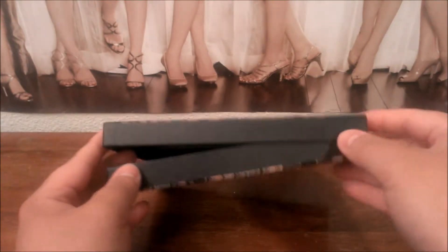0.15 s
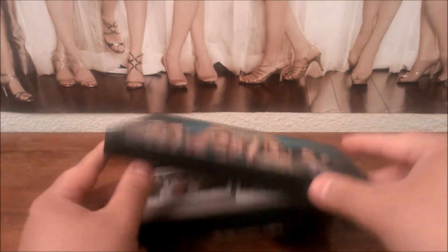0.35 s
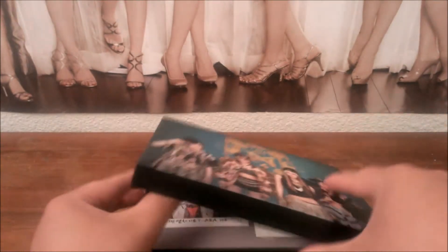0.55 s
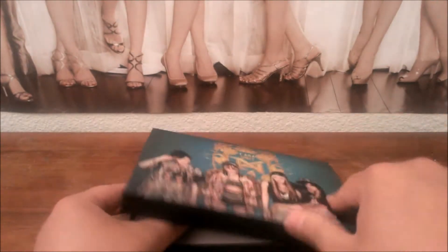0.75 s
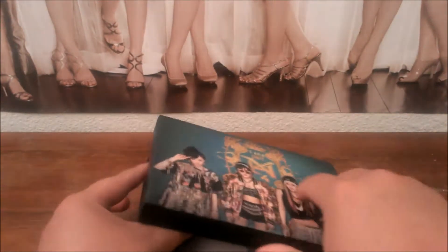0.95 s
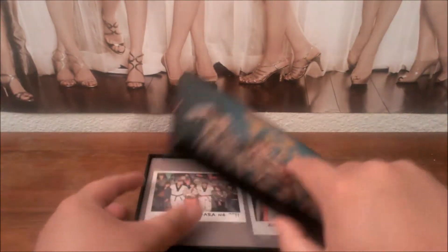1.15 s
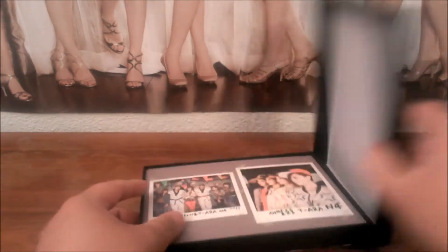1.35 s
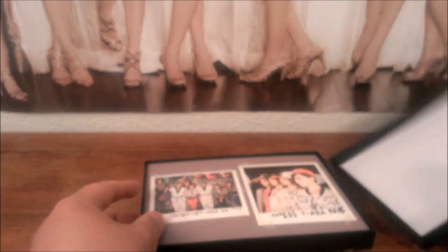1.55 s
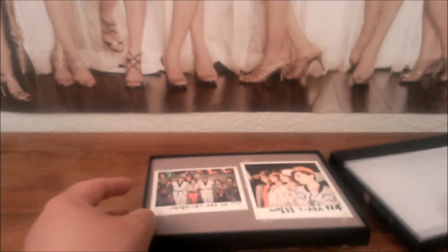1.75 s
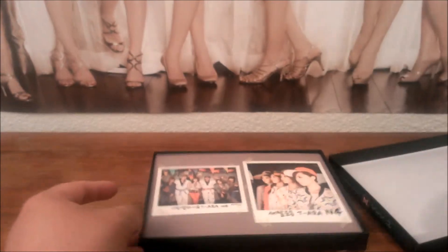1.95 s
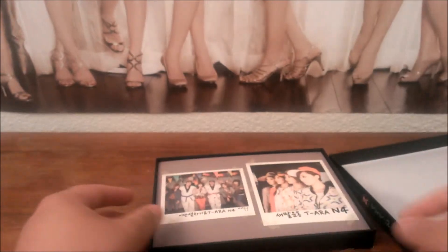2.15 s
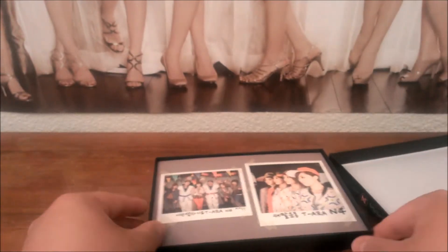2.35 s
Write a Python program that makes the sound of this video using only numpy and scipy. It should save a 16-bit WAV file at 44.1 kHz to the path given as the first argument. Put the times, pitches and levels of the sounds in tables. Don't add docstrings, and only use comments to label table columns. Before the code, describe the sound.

A stiff cardboard lid is worked off its box with soft finger rubbing, one firm knock and small taps, then dropped with a scraping clack and final knocks on a wooden table, close in a quiet room.

```python
import sys
import numpy as np
from scipy import signal
from scipy.io import wavfile

SR = 44100
rng = np.random.default_rng(int(sys.argv[2]) if len(sys.argv) > 2 else 0)


def ratio_of_db(decibels):
    return 10 ** (np.asarray(decibels, float) / 20)


def unload_audio(sound):
    columns = np.transpose(np.atleast_2d(sound))
    steps = np.round(np.clip(columns, -1, 1) * 32767)
    wavfile.write(sys.argv[1], SR, steps.astype(np.int16))


N = 109941


def rms_one(x):
    return x / np.sqrt(np.mean(x ** 2) + 1e-20)


def curve(rows):
    return np.interp(np.arange(N) / SR, *np.transpose(rows))


def drift(rate):
    r = np.exp(-80 * np.pi * rate / SR)
    slow = signal.lfilter([1], [1, -2 * r, r * r], rng.standard_normal(N // 40 + 2002))[2000:]
    return np.interp(np.arange(N) / 40, np.arange(len(slow)), rms_one(slow))


def ring(x, hz, t60):
    r = ratio_of_db(-60 / (np.maximum(t60, 1e-3) * SR))
    w = 2 * np.pi * hz / SR
    return signal.lfilter([0, np.sin(w)], [1, -2 * r * np.cos(w), r * r], x + 1e-18)


def colour(x, spectrum, patchy_db=0):
    hz, db = np.transpose(spectrum)
    edges = 25 * 2 ** np.arange(0, 9.3, .5)
    out, power = 0, 0
    for k, (low, high) in enumerate(zip(edges, edges[1:])):
        gain = ratio_of_db(np.interp(np.log(low * high) / 2, np.log(hz), db, left=-60, right=db[-1]))
        band_pass = signal.butter(2, [low, high], "band", fs=SR, output="sos")
        band = signal.sosfilt(band_pass, x + 1e-18)
        flicker = ratio_of_db(patchy_db * drift(33)) if patchy_db else 1
        out = out + (-1) ** k * gain * band * flicker
        power += gain ** 2 * (high - low) / (SR / 2)
    return out / np.sqrt(power)


def fall(s, rise_s, hold_s, tail_s):
    t = np.arange(N) / SR - s
    tail = np.exp(-np.maximum(t - rise_s - hold_s, 0) / np.maximum(tail_s, 1e-4))
    return np.clip(t / rise_s, 0, 1) * tail


RIGHT_LAG_S, PORT_HZ, PORT_Q = .0001, 5000, 2.0
DIP_HZ, DIP_DB, DIP_Q = 1300, -9, .9


def through_air(x, pan_db):
    late = np.interp(np.arange(N) - RIGHT_LAG_S * SR, np.arange(N), x)
    w = 2 * np.pi * PORT_HZ / SR
    r = np.exp(-w / (2 * PORT_Q))
    poles = [1, -2 * r * np.cos(w), r * r]
    late = signal.lfilter([sum(poles)], poles, late + 1e-18)
    middle = signal.lfilter(*signal.iirpeak(DIP_HZ, DIP_Q, fs=SR), late)
    late = late - (1 - ratio_of_db(DIP_DB)) * middle
    return np.array([x * ratio_of_db(pan_db / 2), -late * ratio_of_db(-pan_db / 2)])


# frequency in Hz, density in dB per Hz.
HISS_LEFT = [(25, -9), (60, -13), (180, 3.5), (500, -10.5), (2000, -15.5), (5000, -16.5), (7000, -13),
             (10500, -35)]
HISS_RIGHT = [(25, 17.5), (40, -16), (80, 0.5), (180, -4.5), (500, -18.5), (2000, -22), (5000, -21.5),
              (11000, -33.5)]
HISS_LEFT_DB, HISS_RIGHT_DB = -65, -62.5
WHINE_HZ, WHINE_WIDTH_HZ, WHINE_DB, WHINE_FROM_S = 1880, 70, -73, 1.9
OVERTONE_DB, THROB_DB = -4, -0.5


def floor():
    left, right, air = rng.standard_normal((3, N))
    t60 = 2.2 / WHINE_WIDTH_HZ
    tone = rms_one(ring(air, WHINE_HZ, t60))
    octave = rms_one(ring(air, 2 * WHINE_HZ, t60 / 4))
    swell = 0.32 + fall(WHINE_FROM_S, 0.42, 1, 1)
    whine = (tone + ratio_of_db(OVERTONE_DB) * octave) * ratio_of_db(WHINE_DB + THROB_DB * drift(45)) * swell
    hiss_left = ratio_of_db(HISS_LEFT_DB) * colour(left, HISS_LEFT, patchy_db=1.2)
    hiss_right = ratio_of_db(HISS_RIGHT_DB) * colour(right, HISS_RIGHT, patchy_db=1.4)
    return np.array([hiss_left, hiss_right]) + through_air(whine, 12)


ROOM_T60_S, ROOM_DB, WALL_CUT_HZ = 0.21, -25.5, 2200


def room(x):
    out = np.zeros((2, N))
    dull = np.exp(-2 * np.pi * WALL_CUT_HZ / SR)
    lags = (rng.uniform(.007, 0.025, 12) * SR).astype(int)
    for k, lag in enumerate(lags):
        loop, state = x.copy(), [0.]
        gain = ratio_of_db(-60 * lag / SR / ROOM_T60_S)
        for i in range(lag, N, lag):
            back, state = signal.lfilter([gain * (1 - dull)], [1, -dull], loop[i - lag:i], zi=state)
            loop[i:i + lag] += back[:N - i]
        out[k % 2] += (loop - x) * (-1) ** (k // 2)
    return out


# time in seconds, level in dB, extra brightness in dB.
RUB = [(0, -67, -14), (0.082, -62.5, 0), (0.189, -95, 0), (.3, -76, 4), (0.471, -72.5, -2),
       (.75, -74.5, 1.5), (.87, -63, -2.5), (1.04, -77.5, 4.5), (1.13, -69.5, -9.5), (1.2, -66, -6.5),
       (1.379, -66.5, -12), (1.459, -63.5, -4), (1.538, -60.5, -9), (1.59, -81, 4.5), (1.69, -87, -1),
       (1.8, -67.5, -10.5), (1.949, -56.5, -9.5), (2.25, -74.5, -26)]
# frequency in Hz, density in dB per Hz.
RUB_COLOUR = [(300, -2.5), (1000, -2.5), (2200, -5.5), (5000, -3.5), (11000, -2)]
RUB_DB, RUB_PAN_DB = -0.5, 22.5
RUB_PATCH_DB, RUB_SPLIT_HZ = .8, 5000


def rub():
    s, level_db, bright_db = np.transpose(RUB)
    hiss = colour(rng.standard_normal((2, N)), RUB_COLOUR, patchy_db=RUB_PATCH_DB)
    dull = signal.lfilter(*signal.butter(3, RUB_SPLIT_HZ, fs=SR), hiss)
    top = signal.lfilter(*signal.butter(3, RUB_SPLIT_HZ, "high", fs=SR), hiss)
    gripped = dull + top * ratio_of_db(curve(np.c_[s, bright_db]))
    shared, right_only = gripped * ratio_of_db(curve(np.c_[s, level_db]) + RUB_DB + 0.7 * drift(38))
    extra = 4.26 * through_air(right_only, RUB_PAN_DB) * np.array([[0], [1]])
    return through_air(shared, RUB_PAN_DB) + extra


# frequency in Hz, level in dB, T60 in seconds.
BOX = [(358, 8.5, 0.024), (390, -26.5, 0.047), (510, -8.5, 0.033), (690, 17, 0.019), (758, -6.5, 0.03),
       (880, -0.5, 0.058), (1026, 12, 0.017), (1392, 17.5, 0.012), (1570, 13.5, 0.004), (1840, 4.5, 0.039),
       (2430, -6, 0.045), (2650, 5.5, 0.008), (3230, -7, 0.016), (3980, -3.5, 0.0033)]
# time in seconds, level in dB.
DRAG = [(0, -62), (.1, -62), (.18, -75), (.42, -61), (.55, -70.5), (1.05, -68.5), (1.12, -63), (1.3, -60.5),
        (1.45, -77), (1.6, -88), (1.77, -73), (1.84, -48), (1.96, -48), (2.05, -90), (2.2, -99)]
DRAG_GRAINS_PER_S, DRAG_LUMP_DB = 3000, 1.8


def drag():
    grains = (rng.random(N) < DRAG_GRAINS_PER_S / SR) * rng.standard_normal(N)
    grit = grains * ratio_of_db(DRAG_LUMP_DB * drift(34))
    hum = sum((-1) ** k * ring(grit, hz, t60) * ratio_of_db(db) for k, (hz, db, t60) in enumerate(BOX))
    return through_air(rms_one(hum) * ratio_of_db(curve(DRAG)), 4.3)


# start in seconds, peak level in dB, pitch in Hz, hold in ms, tail in ms.
TICKS = [(.101, -66, 4080, 3.3, 7.6), (.305, -62, 8300, 15, 8), (.395, -62, 6900, 15, 7.7),
         (0.409, -60, 8600, 4.9, 4.6), (.445, -61.5, 2100, 37, 15), (.477, -60, 8200, 12, 7.9),
         (0.479, -59, 3250, 4.5, 4.1), (0.798, -52.5, 1360, 3.2, 3), (1.18, -63, 3000, 17, 10),
         (1.44, -57.5, 2080, 21, 12), (1.527, -58.5, 4400, 5.6, 6.8), (1.527, -53, 7300, 5, 3),
         (1.748, -61.5, 4080, 2.5, 10), (1.747, -64, 6500, 1.2, 2.2), (1.772, -59.5, 5350, 15, 10),
         (1.79, -59, 8000, 3, 4.6), (1.827, -62, 4000, 3.7, 2.8), (1.8588, -44, 5500, 2.7, 2.7),
         (1.864, -38.5, 3870, 1.9, 2.7), (1.86, -36, 2920, 1.8, 16), (1.862, -47, 8200, 1.8, 3.1),
         (1.904, -44, 5170, 1.2, 4.2), (1.933, -53, 8500, 1.5, 2.2), (1.9345, -34, 2720, 4.2, 6),
         (1.938, -51, 4100, 1, 2.1), (1.968, -50, 5440, 1.2, 3), (1.972, -59, 9000, 1.2, 2.2),
         (2.093, -50.5, 8330, 4.7, 24), (2.163, -58.5, 8200, 2.5, 2.9), (2.301, -69, 4660, 37, 29),
         (2.41, -67.5, 3800, 8.4, 6)]
TICK_Q, TICK_PAN_DB, TICK_RISE_S = 7.3, 6, 0.00036
SWELL = 0.17


def ticks():
    out = np.zeros(N)
    grit = rng.standard_normal(N) * ratio_of_db(1.63 * drift(100))
    for s, db, hz, hold_ms, tail_ms in TICKS:
        span = slice(int(s * SR), int(s * SR) + SR // 8)
        envelope = fall(s, TICK_RISE_S + SWELL * hold_ms / 1000, hold_ms / 1000, tail_ms / 1000)
        puff = signal.lfilter(*signal.iirpeak(hz, TICK_Q, fs=SR), (grit * envelope)[span])
        out[span] += ratio_of_db(db) * puff * np.sqrt(TICK_Q * SR / (np.pi * hz))
    return through_air(out, TICK_PAN_DB)


# start in seconds, peak level in dB, hold in ms, tail in ms.
SLIPS = [
    (1.858, -32, 3.2, 9.3),
    (1.932, -34.5, 1.4, 1.9),
    (1.939, -38.5, 1.5, 10.6),
    (2.40, -58, 25, 17),
]
# frequency in Hz, density in dB per Hz.
SKID = [(500, 3), (1000, -12), (1600, 0), (2800, -4), (4300, -18), (7000, 6.5), (11000, -41)]
SKID_GRAINS_PER_S, SKID_PAN_DB = 9000, 4


def skids():
    grains = (rng.random(N) < SKID_GRAINS_PER_S / SR) * rng.standard_normal(N)
    grit = rms_one(grains * ratio_of_db(0.62 * drift(210)))
    stroke = 0
    for s, db, hold_ms, tail_ms in SLIPS:
        stroke = stroke + ratio_of_db(db) * fall(s, 0.00052, hold_ms / 1000, tail_ms / 1000)
    return through_air(colour(grit, SKID) * stroke, SKID_PAN_DB)


# start in seconds, peak level in dB, extra depth in dB per octave.
THUMPS = [(0.034, -46.5, 0), (0.093, -43, 7), (0.261, -41.5, 5), (0.341, -49, 3), (0.438, -54.5, 14),
          (0.534, -46, 8), (0.597, -22.5, 11), (0.624, -29.5, -5.5), (0.663, -37.5, -11),
          (0.699, -51, 26.5), (0.809, -33.5, 2), (0.848, -41, 15), (0.932, -44, 0.5), (1.093, -38.5, -6),
          (1.131, -47, -4), (1.218, -44.5, -3), (1.282, -39.5, 4), (1.334, -38.5, 6.5), (1.458, -55, 1),
          (1.496, -45.5, -7), (1.53, -28.5, -1), (1.788, -38.5, -9.5), (1.816, -27.5, -9), (1.866, -17, 4),
          (1.896, -29, 11.5), (1.965, -25, 1.5), (2.072, -23.5, 1), (2.098, -56, 15), (2.165, -24, 10.5),
          (2.427, -51, 5), (2.467, -52.5, 20)]
# frequency in Hz, right level in dB, left level in dB, T60 in seconds.
TABLE = [(82.4, -14, -52, 0.27), (116.9, -23, -30, 0.22), (163, 0.5, -25, 0.17), (201, -0.5, -23.5, 0.06),
         (238, -23.5, -14, 0.13), (331.2, -19, -38.5, 0.27), (394.7, -40.5, -41.5, 0.78)]
# time in seconds, level in dB.
LEAN = [(0, -46.5), (.2, -73), (.4, -61.5), (1.0, -57), (1.3, -52), (1.7, -65), (1.85, -25.5), (2.3, -71.5),
        (2.49, -48.5)]
THUMP_DB, CONTACT_S, TABLE_LOW_HZ = 0.5, 0.0039, 52.6
LEAN_DB, TREMOR_LUMP_DB = 0.5, 2.2


def table():
    out = np.zeros((2, N))
    tremor_db = curve(LEAN) + LEAN_DB + TREMOR_LUMP_DB * drift(11) - 29.5
    tremor = rng.standard_normal(N) * ratio_of_db(tremor_db)
    luck = rng.normal(0, 1.98, (len(THUMPS), len(TABLE)))
    n = max(int(CONTACT_S * SR), 8)
    shape = np.diff(np.hanning(n + 2)) * (0.0044 * SR / n)
    for k, (hz, right_db, left_db, t60) in enumerate(TABLE):
        push = tremor.copy()
        for (s, db, deep_db), chance in zip(THUMPS, luck):
            i = int(s * SR)
            push_db = db + THUMP_DB + chance[k] + deep_db * np.log2(163 / hz)
            push[i:i + n + 1] += shape[:N - i] * ratio_of_db(push_db)
        out += ring(push, hz, t60) * ratio_of_db(np.array([[left_db], [right_db]])) * (-1) ** k
    return signal.lfilter(*signal.butter(2, TABLE_LOW_HZ, "high", fs=SR), out)


# start in seconds, peak level in dB, brightness in dB, pitch in Hz, ring of the body in dB.
TAPS = [(0.265, -50, -18, 363, 4), (.271, -56, -4.5, 450, -5), (0.5316, -49.5, -13, 1030, -22),
        (0.5315, -33, -12.5, 980, -9), (0.5953, -15, -12.5, 950, 2), (0.6619, -35, -22, 543, 0.5),
        (0.8085, -28, -11, 1130, 6), (.93, -50.5, -25, 420, -0.5), (1.087, -43.5, -16, 744, 3.5),
        (1.109, -50.5, -32, 880, 4.5), (1.283, -51.5, -9, 704, 2), (1.498, -54, -10, 500, 3),
        (1.517, -44, -12, 1300, 11), (1.793, -46, -18, 600, -8), (1.814, -38.5, -3.5, 1100, 2.5),
        (1.905, -46, -9, 1090, 0), (1.925, -44.5, -1, 900, 1.5), (1.939, -40, -17, 1150, -6),
        (1.969, -43.5, -20, 930, 7), (1.9795, -32.5, -28, 1400, 5), (2.0680, -23.5, -15.5, 1000, 2.5),
        (2.0698, -24.5, -27, 1050, -7), (2.164, -49.5, -6.5, 493, -7)]
# frequency in Hz, level in dB, T60 in seconds.
LID = [(440, 1, .03), (580, 4, 0.075), (727, 19, 0.015), (973, 15, 0.012), (1300, 11, 0.012),
       (1476, 8.5, .011), (1710, -7, 0.032), (2400, -11, 0.018), (2660, -12, .012), (3850, 5, .009),
       (4400, 4, .009)]
# frequency in Hz, density in dB per Hz.
CRACK = [(1200, -13.5), (2000, -2), (4200, -20.5), (6300, -11.5), (11000, -29)]
LID_OFF_S, TAP_PAN_DB, BOX_LOW_HZ = 1.4, 4.5, 207
BLOW_DB, BLOW_CYCLES = 2, 6.8
SOFTNESS = 2.55
RATTLE_S, RATTLE, RATTLE_RISE_S = .0045, .06, .0005
BOX_DB, RING_REST_DB, OFF_PITCH_DB = -12, 3, 3
CRACK_DB, CRACK_S = 3, 0.0029


def knocks():
    out = np.zeros((2, N))
    luck = rng.normal(0, 0.53, (len(TAPS), len(BOX)))
    noise = rng.standard_normal((2, N))
    bright = colour(noise[1], CRACK)
    for (s, db, bright_db, centre_hz, ring_db), chance in zip(TAPS, luck):
        i, body = int(s * SR), np.zeros(N)
        span = slice(i, min(i + SR // 5, N))
        force = (RATTLE * noise[0] * fall(s, RATTLE_RISE_S, 0, RATTLE_S))[span]
        force[2] += 1
        force = signal.lfilter(*signal.butter(2, SOFTNESS * centre_hz, fs=SR), force)
        body[span] = ratio_of_db(BLOW_DB) * ring(force, centre_hz, BLOW_CYCLES / centre_hz)
        modes = BOX if s < LID_OFF_S else LID
        for k, (hz, mode_db, t60) in enumerate(modes):
            off_pitch_db = OFF_PITCH_DB * np.log2(hz / centre_hz) ** 2
            gain_db = BOX_DB + ring_db - RING_REST_DB + mode_db + chance[k] - off_pitch_db
            body[span] += ring(force, hz, t60) * ratio_of_db(gain_db)
        crack = bright * (fall(s, 0.0001, 0, CRACK_S) + 0.12 * fall(s, 0.0024, 0, 0.029))
        out += through_air(ratio_of_db(db) * (body + ratio_of_db(CRACK_DB + bright_db) * crack), TAP_PAN_DB)
    return signal.lfilter(*signal.butter(2, BOX_LOW_HZ, "high", fs=SR), out + 1e-18)


def scene():
    air = knocks() + skids() + drag() + ticks()
    echoes = ratio_of_db(ROOM_DB) * room(air[0]) * ratio_of_db(np.array([[0], [1.5]]))
    return table() + air + echoes + rub() + floor()


def band_limit(x):
    return signal.sosfilt(signal.butter(12, 11500, fs=SR, output="sos"), x)


def record(dry):
    low_pass = signal.ellip(10, .5, 75, 10520, fs=SR, output="sos")
    return band_limit(signal.sosfilt(low_pass, dry))


dry = scene()
out = record(dry)
unload_audio(out)
```